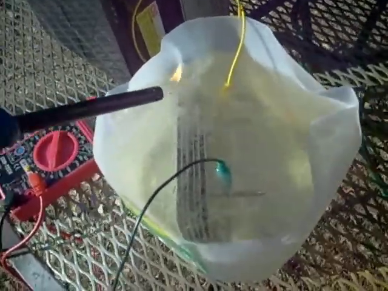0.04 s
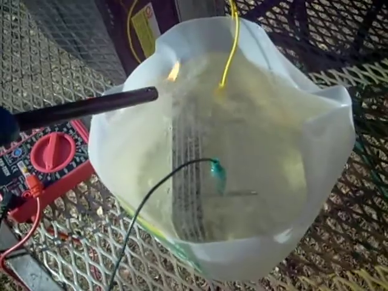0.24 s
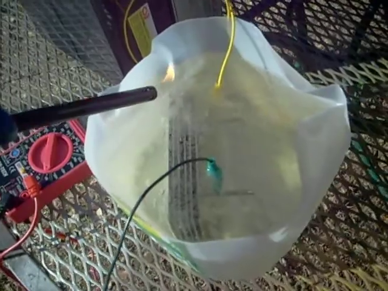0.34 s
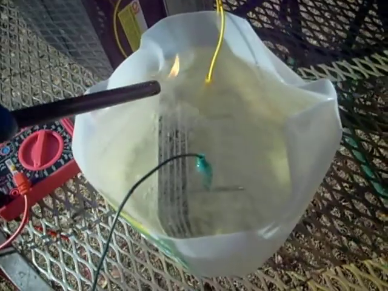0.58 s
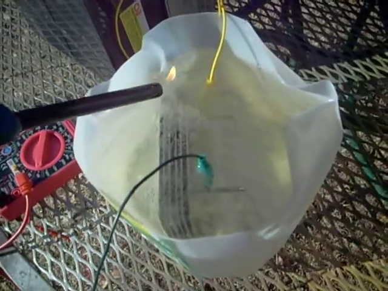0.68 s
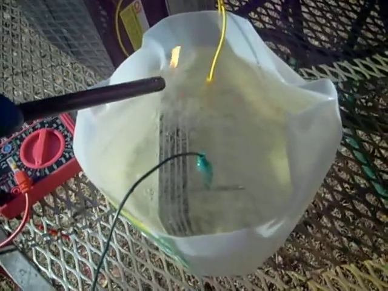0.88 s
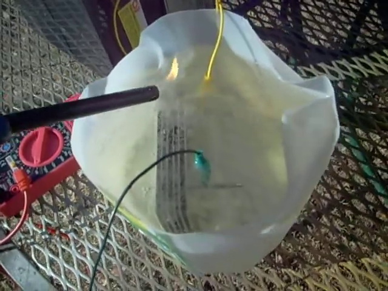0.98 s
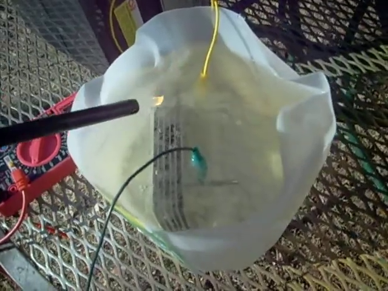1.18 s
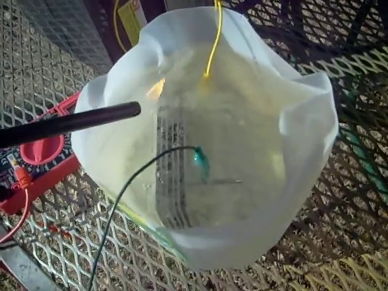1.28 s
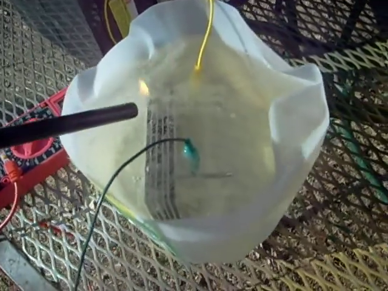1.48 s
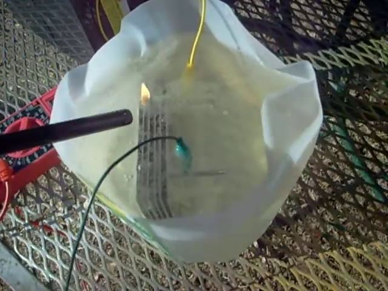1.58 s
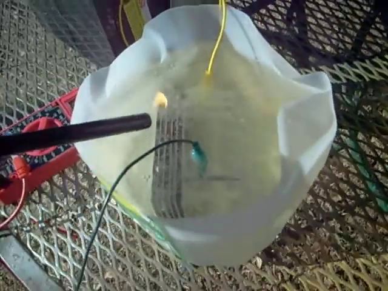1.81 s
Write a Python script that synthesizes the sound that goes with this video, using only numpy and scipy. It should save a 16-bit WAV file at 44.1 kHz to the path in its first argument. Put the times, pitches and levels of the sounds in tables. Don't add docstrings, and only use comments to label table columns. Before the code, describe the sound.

Two loud, clipped gas pops a second apart, over faint distant engine hum and outdoor hush

```python
import sys
import numpy as np
from scipy import signal
from scipy.io import wavfile
from scipy.ndimage import uniform_filter1d

SR = 44100
rng = np.random.default_rng(int(sys.argv[2]) if len(sys.argv) > 2 else 0)


def field_ratio(decibels):
    return 10 ** (np.asarray(decibels, dtype=float) / 20)


def materialize(psi):
    bounded = np.clip(np.atleast_2d(psi).T, -1, 1)
    quanta = np.round(bounded * 32767).astype(np.int16)
    wavfile.write(sys.argv[1], SR, quanta)


N = 81585

# t/s, peak level/dB, shock length/ms, side ring level/dB
POPS = [
    (0.213009, 1.09, .049, -1.6),
    (0.219137, -2.64, .049, .91),
    (1.212676, 2.52, .121, -.59),
]
# high ring level/dB, echo level/dB, echo tilt away from the cavity/(dB per octave)
POP_SPACE = [(-15, -23.5, -7.5), (-13.5, -23.5, -10.5), (-16, -22, 2.5)]
# f/Hz, level/dB, time to fall 60 dB/s
CAVITY = [(3161, 5.6, .00675)]
# f/Hz, level/dB, time to fall 60 dB/s
SIDE_RINGS = [(1843, -6.8, .004), (2621, -3.8, .006), (3017, -3.1, .0077), (3784, -15.5, .0102),
              (4469, -9, .0052), (5726, -13.1, .0084)]
# f/Hz, level/dB, time to fall 60 dB/s
HIGH_RINGS = [(2770, -22, .03), (4420, -27, 0.0047), (6900, -21.5, .012), (9300, -32.5, .01)]
# f/Hz, level/dB
ECHO_COLOUR = [(100, -22), (1200, -14), (2000, -3), (2700, 0), (4800, -7), (5500, -17), (7200, -16),
               (7900, -38)]
# f/Hz, time to fall 60 dB/s
ECHO_T60 = [(200, .08), (1500, .1), (2600, .13), (5000, 0.096), (7000, 0.053), (9000, .05)]
# t/s, level/dB, f/Hz
TICKS = [(.256, -46.5, 4600), (.307, -61, 5500), (.597, -57.5, 4000), (1.3065, -53, 4570),
         (1.366, -51, 4460), (1.386, -63, 6200), (1.405, -63, 9790), (1.482, -52, 4240), (1.597, -45, 3140),
         (1.689, -50, 4380), (1.7, -52.5, 4600), (1.713, -64, 7100)]
# f/Hz, level/dB, time to fall 60 dB/s
GRATING = [(2466, -60, 2.2), (2474.3, -60.5, 2.2), (4716, -83, 1.6), (4720.5, -83, 1.6)]
# multiple of the turning rate, level/dB
FIRING = [(2, -63), (4, -65), (6, -62), (8, -69), (10, -71)]
PANEL = [14.5, 15.5, 16.5, 17.5, 18.5, 19.5, 20.5, 21.5]
PANEL_DB = [-78, -66.5, -67, -69.5, -67, -67, -63.5, -83.5]
# t/s, tone level/dB, rattle level/dB
BOOM = [(0, -1, -68.5), (.25, -10, -71), (.45, -3.5, -65.5), (.7, 0, -59), (.9, -3, -67), (1.1, -6, -66.5),
        (1.4, -0.5, -62.5), (1.6, 1, -73), (1.85, -3.5, -73)]
# t/s, f/Hz
BOOM_HZ = [(0, 620), (.9, 650), (1.4, 720), (1.85, 660)]
# f/Hz, level/(dB per Hz)
WASH_LOW = [(12, -30.5), (20, -18.5), (59, -3.5), (157, -3.5), (206, -1.5), (462, -5), (680, -7.5),
            (778, -2.5), (2000, -9), (2600, -44), (4400, -120)]
# f/Hz, level/(dB per Hz)
WASH_HIGH = [(1180, -33), (2000, -1.5), (2610, -4), (3150, 2.5), (4140, -15.5), (5040, -24.5), (10100, -26),
             (11200, -32), (13000, -59)]
# t/s, level/dB
DRIFT = [(0, 1), (.3, 1.5), (.6, 1.5), (1.1, 1.5), (1.4, 0), (1.85, 0)]

ECHO_PATCHY_DB = 4
TICK_T60_S, TICK_RISE_PER_S = .008, 6.0
GRATING_S = .283
ENGINE_HZ, WAVER = 34.65, .0018
BOOM_WIDTH_HZ = 200
LOW_DB, HIGH_DB = -56.5, -60
WASH_SPLIT_HZ, RUMBLE_CUT_HZ = 2000, 45
TOP, BOTTOM = .629, .652
FOLD, FOLD_TOP = 13.9, .02
EDGE_HZ, TOP_HZ = 11300, 16800
CEILING, MAKE_UP = .69, 1.06


def evened(x):
    return x / np.sqrt(np.mean(x ** 2) + 1e-20)


def read(points, hz):
    f, value = np.transpose(points)
    return np.interp(np.log(hz + 1), np.log(f + 1), value)


def curve(points, t, column=1):
    rows = np.array(points)
    return np.interp(t, rows[:, 0], rows[:, column])


def add(mix, s, sound):
    part = mix[round(s * SR):][:len(sound)]
    part += sound[:len(part)]


def slow(t, top_hz):
    wander = 0
    for f in np.geomspace(.5, top_hz, num=20):
        wander = wander + np.sin(2 * np.pi * (f * t + rng.random())) / np.sqrt(f)
    return evened(wander)


def rings(modes, t):
    return sum(field_ratio(db - 60 * t / t60) * np.sin(2 * np.pi * hz * t) for hz, db, t60 in modes)


def echoes(tilt_db, t):
    hz, frame_t, z = signal.stft(rng.standard_normal(len(t)), SR, nperseg=128)
    octaves_away = abs(np.log2((hz + 1) / CAVITY[0][0]))
    colour_db = read(ECHO_COLOUR, hz) + tilt_db * octaves_away
    patches = evened(uniform_filter1d(rng.standard_normal(z.shape), size=3, axis=0))
    decay_db = -60 * frame_t / read(ECHO_T60, hz)[:, None]
    z = z * field_ratio(colour_db[:, None] + ECHO_PATCHY_DB * patches + decay_db)
    fade_in = np.clip((t - .003) / .002, 0, 1)
    return signal.istft(z, SR, nperseg=128)[1][:len(t)] * fade_in


def pop(start, peak_db, length_ms, side_db, high_db, echo_db, tilt_db):
    t = np.arange(8192) / SR
    between_samples = (start * SR % 1) / SR
    u = np.maximum(t[:400] - between_samples, 0) / (length_ms / 1000)
    shock = u * (1 - u / 2) * np.exp(-u)
    hollow = rings(CAVITY, t) - field_ratio(side_db) * rings(SIDE_RINGS, t)
    ring = signal.fftconvolve(shock, hollow)[:8192]
    high_fade_in = np.clip((t - .0012) / .003, 0, 1)
    ring = ring / abs(ring).max() + field_ratio(high_db) * rings(HIGH_RINGS, t) * high_fade_in
    return int(start * SR) / SR, field_ratio(peak_db) * ring + field_ratio(echo_db + .5) * echoes(tilt_db, t)


def grating():
    return rings(GRATING, np.arange(SR) / SR)


def ticks():
    out, t = np.zeros(N), np.arange(800) / SR
    onset = np.minimum(t / .00066, 1)
    for s, db, hz in TICKS:
        ring = np.sin(2 * np.pi * hz * t * (1 + TICK_RISE_PER_S * t))
        add(out, s, field_ratio(db - 60 * t / TICK_T60_S) * onset * ring)
    return out


def engine():
    t = np.arange(N) / SR
    turn = 2 * np.pi * np.cumsum(ENGINE_HZ * (1 + WAVER * slow(t, 2.9))) / SR

    def tone(multiple, db, sway_db):
        level = np.sqrt(2) * field_ratio(db + sway_db * slow(t, 12))
        return level * np.sin(multiple * turn + 2 * np.pi * rng.random())

    hum = sum(tone(k, db, .67) for k, db in FIRING)
    panel = sum(tone(k, db, 2.5) for k, db in zip(PANEL, PANEL_DB)) * field_ratio(curve(BOOM, t))
    r = np.exp(-np.pi * BOOM_WIDTH_HZ / SR)
    noise = rng.standard_normal(N) + 1j * rng.standard_normal(N)
    rough = signal.lfilter([1], [1, -2 * r, r * r], noise)
    pitch = np.exp(2j * np.pi * np.cumsum(curve(BOOM_HZ, t)) / SR)
    rattle = evened((rough * pitch).real)
    return hum + panel + rattle * field_ratio(curve(BOOM, t, column=2))


def wash(colour, level_db, inside, patchy_db):
    frames, hz = N // 256 + 5, np.fft.rfftfreq(1024, 1 / SR)
    a, b, patches = rng.standard_normal((frames, 513, 3)).T
    patches = uniform_filter1d(patches, size=10, axis=0)
    patches = evened(uniform_filter1d(patches, size=10, axis=1))
    level = field_ratio(read(colour, hz)[:, None] + patchy_db * patches)
    z = (a + 1j * b) * level * inside(hz)[:, None]
    return field_ratio(level_db) * evened(signal.istft(z, nperseg=1024, noverlap=768)[1][:N])


def outdoors():
    def low_part(hz):
        return (hz < WASH_SPLIT_HZ) / (1 + (RUMBLE_CUT_HZ / (hz + 1)) ** 2)

    def high_part(hz):
        return hz >= WASH_SPLIT_HZ

    bed = wash(WASH_LOW, LOW_DB, low_part, 1.0) + wash(WASH_HIGH, HIGH_DB, high_part, 1.6)
    return bed * field_ratio(curve(DRIFT, np.arange(N) / SR))


def scene():
    mix = outdoors() + engine() + ticks()
    add(mix, GRATING_S, grating())
    for row, space in zip(POPS, POP_SPACE):
        add(mix, *pop(*row, *space))
    return mix[None]


def roll_off(x):
    return signal.sosfilt(signal.butter(12, 17250, fs=SR, output="sos"), x)


def record(dry):
    folded = np.minimum(-BOTTOM + FOLD * (-BOTTOM - dry), FOLD_TOP)
    overloaded = np.where(dry < -BOTTOM, folded, np.minimum(dry, TOP))
    half_rate = overloaded * (1 - np.arange(N) % 2)
    smoother = 2 * signal.firwin(41, EDGE_HZ, window=("kaiser", 5), fs=SR)
    smooth = signal.oaconvolve(half_rate, smoother[None], "same")
    capped = np.minimum(MAKE_UP * smooth, CEILING)
    finished = signal.oaconvolve(capped, signal.firwin(101, TOP_HZ, fs=SR)[None], "same")
    return roll_off(finished)


dry = scene()
out = record(dry)
materialize(out)
```